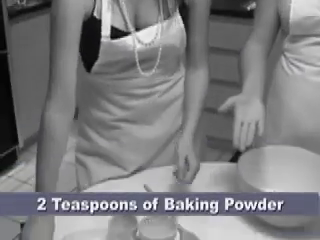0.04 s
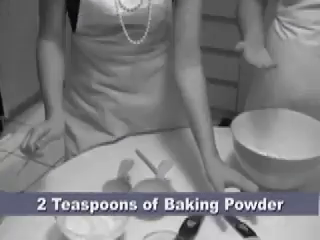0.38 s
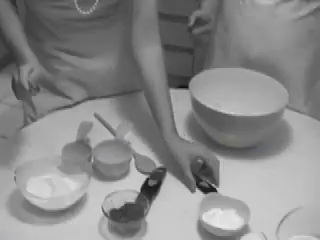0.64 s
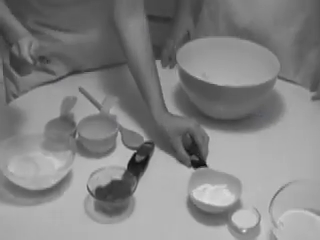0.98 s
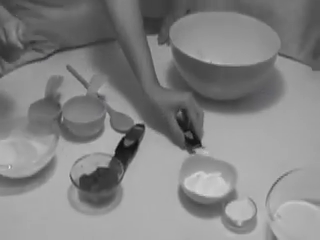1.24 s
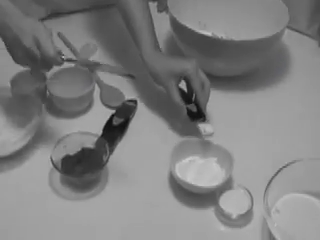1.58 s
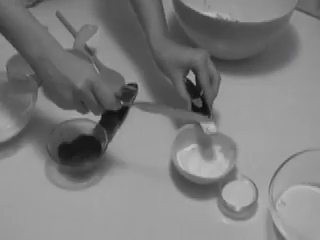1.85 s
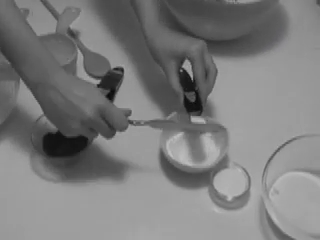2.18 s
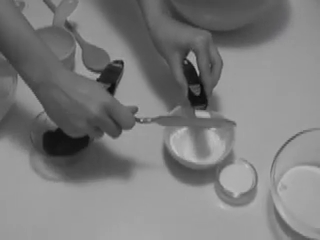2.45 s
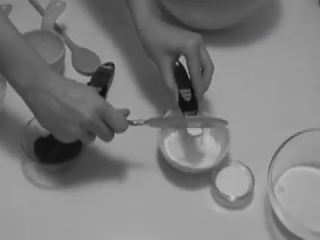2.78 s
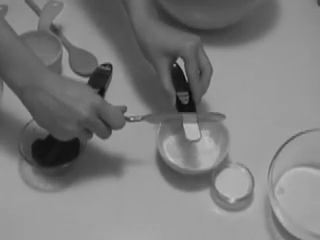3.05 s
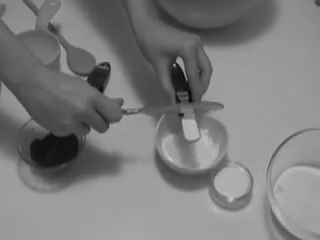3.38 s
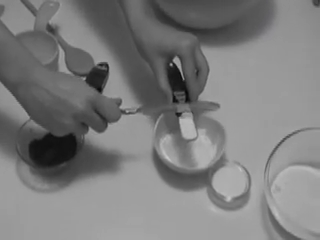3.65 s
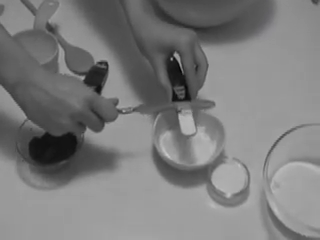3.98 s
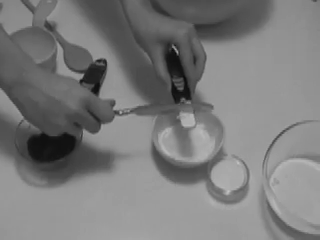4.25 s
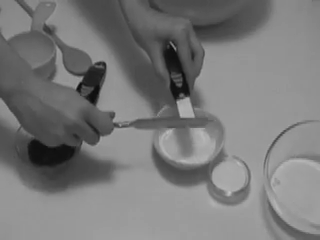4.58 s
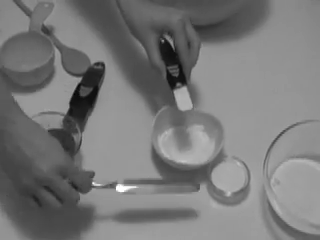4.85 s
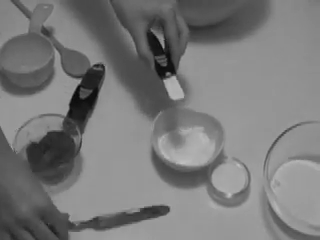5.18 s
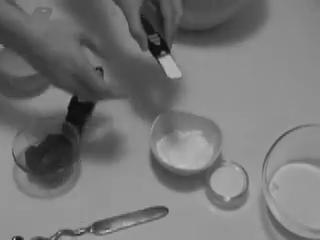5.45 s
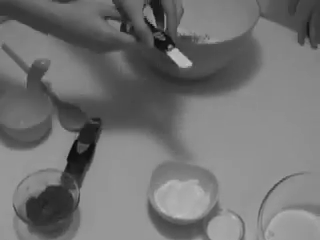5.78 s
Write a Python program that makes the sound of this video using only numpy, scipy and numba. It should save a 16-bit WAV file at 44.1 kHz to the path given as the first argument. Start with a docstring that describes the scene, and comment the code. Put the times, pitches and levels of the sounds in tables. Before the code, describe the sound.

A hard utensil clacks down in a kitchen, followed by soft brushing of hands and a couple of faint spoon ticks on a small bowl. A knife blade taps a metal measuring spoon and scrapes lightly across it, levelling powder with a brief rasp. Near the end the knife drops on the table, bouncing and ringing loudly. The microphone is close, with short room reverberation and a faint motor whine.

```python
"""In a live kitchen, a knife levels a spoonful of powder over a small bowl. A hard utensil clacks down
and hands brush softly; the held blade ticks on the metal spoon and scrapes across it by stick-slip
friction. Near the end the knife drops on the table, bounces and rings in its free modes.
Reverberation follows each blow; a camera with a faint motor whine and gain control listens close by."""
import sys
import numpy as np
from scipy import signal
from scipy.fft import rfft, irfft
from scipy.io import wavfile
from scipy.ndimage import uniform_filter1d
from numba import njit

SR = 44100
rng = np.random.default_rng(int(sys.argv[2]) if len(sys.argv) > 2 else 0)


def wrap_up_sound(samples):
    """Save the sound to the file named by the first command line argument, as 16-bit audio."""
    columns = np.atleast_2d(samples).T
    # keep every value between -1 and 1, then stretch to whole-number steps
    tamed = np.clip(columns, -1, 1)
    steps = np.round(tamed * 32767).astype(np.int16)
    wavfile.write(sys.argv[1], SR, steps)


N = 261645
TIME = np.arange(N) / SR
RING_TIME = TIME[:SR]

# modes of the freely ringing knife: (frequency [Hz], level [dB], t60 [s])
KNIFE_MODES = [(374, -8, .25), (1050, -3, .3), (1104, 0, .17), (1367, -7, .3), (1780, -7, .26),
               (2083, 2, .33), (2659, -7, .3), (2831, -8, .3), (3838, 2.5, .45), (4200, -8, .3),
               (4643, -9, .35), (5052, -12, .35), (6002, -16, .35), (6578, -7, .42), (7238, -16, .7),
               (7560, -8, .14), (8985, -8, .24), (9636, -14, .14), (10320, -18, .2), (11278, -12, .21),
               (13080, -20, .23), (13432, -14, .23), (14485, -24, .22)]
# modes of the blade pressed on the spoon, damped by the hand: (frequency [Hz], level [dB], t60 [s])
HELD_MODES = [(1050, -13, .035), (2540, -7, .025), (2608, -8.5, .11), (3700, -13, .015), (4555, 2, .03),
              (4640, -9, .03), (4850, -10, .02), (5420, -17, .03), (6978, -10, .035), (7680, -16, .02),
              (8060, -17, .04), (10215, -8, .022), (11730, -13, .03), (13890, -23, .03)]
# spectrum of a knock on the tabletop: (frequency [Hz], level [dB])
TABLETOP_SPECTRUM = [(40, -55), (120, -9.5), (230, -14.5), (420, -3), (780, -4.5), (1060, 4.5), (1400, 2.5),
                     (2200, 3), (3800, -0.5), (5600, -6.5), (6700, -10), (8000, -13), (10500, -20),
                     (15000, -44)]
TABLETOP_T60_S = 0.033


def undb(db):
    """Decibels to amplitude ratio."""
    return 10 ** (np.asarray(db) / 20)


def unit(x):
    """Normalisation to unit energy."""
    return x / np.sqrt(np.sum(x ** 2))


def steady(x):
    """Normalisation to unit rms."""
    return x / np.std(x)


def along(rows, hz):
    """Interpolation of (frequency [Hz], value) rows on a logarithmic frequency axis."""
    row_hz, value = np.transpose(rows)
    return np.interp(np.log(hz + 1), np.log(row_hz), value)


def colour(x, rows, tilt_db=0):
    """Minimum-phase filter from (frequency [Hz], gain [dB]) rows, tilted per octave above 400 Hz."""
    size = 4096
    hz = np.fft.rfftfreq(size, 1 / SR)
    octaves = np.log2(np.maximum(hz, 400))
    cepstrum = irfft(np.log(undb(along(rows, hz) + tilt_db * octaves)))
    cepstrum[1:size // 2] *= 2
    cepstrum[size // 2 + 1:] = 0
    return signal.fftconvolve(x, irfft(np.exp(rfft(cepstrum))))[:len(x)]


def low_cut(x, hz):
    """Second-order Butterworth high-pass."""
    return signal.sosfilt(signal.butter(2, hz, "highpass", fs=SR, output="sos"), x)


def fade(t60):
    """Exponential decay, one second long, falling 60 dB in t60 seconds."""
    return np.exp(-np.log(1000) * RING_TIME / t60)


def add(track, start_s, sound):
    """Superposition of a sound on a track."""
    i = int(start_s * SR)
    track[i:i + len(sound)] += sound[:N - i]


def ring(modes):
    """Modal vibration: the point of contact gives each damped sinusoid its own sign and weight."""
    chance = rng.standard_normal((len(modes), 2))
    return unit(sum(undb(db + offset_db) * np.sign(side) * fade(t60) * np.sin(2 * np.pi * hz * RING_TIME)
                    for (hz, db, t60), (offset_db, side) in zip(modes, chance)))


def burst(t60, smooth_bins=41):
    """Modal overlap: dense, quickly dying modes merge into a noise burst with a flat spectrum."""
    x = rng.standard_normal(SR) * fade(t60)
    for _ in range(3):
        spectrum = rfft(x[:SR // 10])
        x = irfft(spectrum / np.sqrt(uniform_filter1d(np.abs(spectrum) ** 2, smooth_bins)))
        x *= RING_TIME[:len(x)] < 2 * t60
    return unit(x)


def knock(t60, spectrum, tilt_db=0, click=0.39):
    """Impact response: a sharp contact pulse, then the short ring of the struck body."""
    x = burst(t60)
    x[0] = -click
    return unit(colour(x, spectrum, tilt_db))


def strokes(rows, rise, curve=0.41):
    """Friction envelope: pressure builds for the share `rise` of each stroke, then eases off."""
    return sum(undb(db) * np.interp(TIME, [s, s + rise * length, s + length], [0, 1, 0]) ** curve
               for s, length, db in rows)


def air(level_db=-47):
    """Ambient noise: the room's steady broadband rumble and hiss."""
    # background noise density: (frequency [Hz], relative level [dB])
    spectrum = [(20, -16), (60, -8.5), (90, -10), (125, -3), (200, -5.5), (400, -7), (650, -6.5), (950, -9),
                (1280, -8), (2240, -16.5), (5570, -24), (6900, -35.5), (12800, -36), (15000, -48)]
    return steady(colour(rng.standard_normal(N), spectrum)) * undb(level_db)


def whine_and_hum(hum_hz=55.2, hum_db=-55, hold_s=2.16, fade_db_per_s=7.5):
    """Random modulation broadens the lines of camera motor and mains; a low hum holds, then fades."""
    # motor and mains lines: (frequency [Hz], level [dB], width [Hz], modulation depth [0-1])
    lines = [(119.9, -58.5, 4, .4), (599.4, -64, 4, .3), (1198, -54.5, 10, .7), (1798, -62, 8, .4),
             (2398, -67, 6, .4), (3596, -71, 4, .2), (4196, -73, 4, .2), (4795, -73, 4, .2),
             (5394.6, -64.5, 3, .1), (5696, -76, 3, .1), (5994, -73, 3, .1)]
    hum_gain = undb(hum_db - fade_db_per_s * np.maximum(TIME - hold_s, 0))
    out = np.sqrt(2) * hum_gain * np.sin(2 * np.pi * hum_hz * TIME)
    for hz, db, width_hz, depth in lines:
        phasors = rng.standard_normal((1024, 2)) @ [1, 1j]
        wobble = 1 + depth * np.interp(TIME * 2 * width_hz, np.arange(len(phasors)), phasors)
        out += undb(db) * steady(np.real(wobble * np.exp(2j * np.pi * hz * TIME)))
    return out


def set_down(t60=0.014, ring_db=-17, knife_db=-22, knife_tilt_db=6):
    """Structure-borne coupling: a utensil clacks down and the jolt rings the knife on the table."""
    # the utensil's impacts: (time [s], level [dB])
    impacts = [(0.0246, -17), (0.0287, 8), (.031, -4), (.042, -0.5), (0.069, -14), (.098, -4.5)]
    # its clack: (frequency [Hz], level [dB])
    clack_spectrum = [(40, -25), (130, -17), (400, -9), (900, -0.5), (1500, 2.5), (2700, 4), (3900, -5),
                      (5200, 0), (6000, -6), (6700, -15.5), (7600, -10.5), (8800, -22.5), (10000, -15),
                      (12000, -36), (16000, -28)]
    # its thin ring: (frequency [Hz], level [dB], t60 [s])
    utensil_modes = [(1284, -3, .2), (2514, 0, .2), (5025, -1, .22), (10450, -12, .25), (13500, -19, .18)]
    knife_modes = [(hz, db + knife_tilt_db * np.log2(hz), decay) for hz, db, decay in KNIFE_MODES]
    out = np.zeros(N)
    for s, db in impacts:
        add(out, s, undb(db) * knock(t60, clack_spectrum))
        add(out, s, undb(db + ring_db) * ring(utensil_modes) + undb(db + knife_db) * ring(knife_modes))
    return out


def brushing(grain_db=4):
    """Friction noise: countless tiny contacts of skin and powder sum to a grainy hiss."""
    # brushes of hands, spoon and powder: (start [s], duration [s], level [dB])
    brushes = [(.3, 0.48, -57.5), (.67, 0.22, -52.5), (.92, 0.29, -57), (1.26, 0.16, -55.5),
               (1.6, 0.44, -57), (1.95, 0.53, -59.5)]
    spectrum = [(400, -36), (1800, 7), (2600, 12.5), (5000, 9.5), (8000, -0.5), (11000, 1), (14000, -10)]
    grains = rng.standard_normal(N) * undb(grain_db * rng.standard_normal(N))
    return steady(colour(grains, spectrum)) * strokes(brushes, rise=0.21)


def spoon_ticks(t60=0.035):
    """Damped impact: the spoon touches the bowl, muffled by the powder."""
    # light touches: (time [s], level [dB])
    touches = [(1.171, -28), (1.828, -18), (5.709, -21)]
    # their tick: (frequency [Hz], level [dB])
    spectrum = [(500, -15), (1700, 11), (3000, 3), (5500, 1), (7800, -6.5), (9500, -10), (14000, -15)]
    out = np.zeros(N)
    for s, db in touches:
        add(out, s, undb(db) * knock(t60, spectrum))
    return out


def handling_bumps():
    """Resonance: each dull, soft contact excites one broad low peak."""
    # bumps of handling: (time [s], level [dB], resonance [Hz], t60 [s])
    contacts = [(2.135, -14.5, 620, 0.31), (2.244, -15.5, 332, 0.089)]
    out = np.zeros(N)
    for s, db, hz, t60 in contacts:
        resonance = [(hz / 2, -26), (hz, 0), (hz * 2, -36), (hz * 10, -60)]
        add(out, s, undb(db) * unit(colour(burst(t60), resonance)))
    return out


def blade_taps(tick_db=-11, tick_growth=0.56, tick_t60=0.035, ring_tilt_db=-2, tick_tilt_db=1.7):
    """Contact as a low-pass: each tap on the spoon has its own brightness; dull ones miss high modes."""
    # taps on the spoon: (time [s], level [dB], excitation cutoff [Hz])
    taps = [(2.3476, -7, 4000), (2.393, -21.5, 9150), (2.6369, -2, 12100), (2.673, -23, 6000),
            (2.736, -12, 10500), (2.797, -20.5, 9000), (2.857, -23.5, 13000), (2.983, -29, 11000),
            (3.9439, -2, 4700), (4.164, -25, 6060), (4.539, -23, 9000), (4.647, -18, 11000),
            (4.6519, -14, 11000)]
    # their dry tick: (frequency [Hz], level [dB])
    tick_spectrum = [(300, -22), (1000, -17), (1700, -6), (2500, 15.5), (5000, -15), (6200, -18.5),
                     (10500, -17), (14000, -15)]
    out = np.zeros(N)
    for s, tap_db, cutoff_hz in taps:
        modes = []
        for hz, db, t60 in HELD_MODES:
            rolloff_db = 10 * np.log10(1 + (hz / cutoff_hz) ** 7)
            modes.append((hz, db + ring_tilt_db * np.log2(max(hz, 2500)) - rolloff_db, t60))
        add(out, s, undb(tap_db) * ring(modes))
        tick = knock(tick_t60, tick_spectrum, tick_tilt_db * np.log2(cutoff_hz / 10000), click=0.11)
        # the tick grows more slowly than the ring, so firm taps mostly ring
        add(out, s, undb(tick_db + tick_growth * tap_db) * tick)
    return out


def slips(per_s, spread_db):
    """Stick-slip excitation: a Poisson train of pulses of uneven size."""
    return steady((rng.random(N) < per_s / SR) * undb(spread_db * rng.standard_normal(N)))


def catches(per_s=45, spread_db=4):
    """Amplitude modulation by uneven grip: the blade catches and lets go."""
    gain = undb(spread_db * np.interp(TIME * per_s, np.arange(N), rng.standard_normal(N)))
    return gain / np.sqrt(np.mean(gain ** 2))


def blade_slide():
    """Stick-slip friction on powder grains: sparse slips ring the blade, dense ones merge into a rasp."""
    # slides over the spoon's rim: (start [s], duration [s], level [dB])
    slides = [(2.72, 0.33, -54), (3.15, 0.17, -58), (4.05, 0.31, -62), (4.32, 0.084, -52.5),
              (4.44, .045, -49), (4.51, 0.18, -49.5)]
    # sweeps through the heaped powder: (start [s], duration [s], level [dB])
    sweeps = [(4.515, 0.077, -43), (4.61, 0.059, -43.5)]
    # rasp of the edge in the powder: (frequency [Hz], level [dB])
    rasp_spectrum = [(300, -28), (2000, -18), (2380, 10.5), (2900, 5), (3500, 8.5), (4000, -2), (4800, 3),
                     (5700, -6), (7000, -10), (9000, -18), (10400, -6), (12500, -48), (15000, -32)]
    slip_spectrum = [(1000, -4), (2600, 4.5), (4600, -7), (7200, 2), (10500, -4), (14000, -5)]
    ringing = signal.fftconvolve(slips(per_s=170, spread_db=2), ring(HELD_MODES))[:N]
    ticking = colour(ringing, slip_spectrum)
    rasp = steady(colour(slips(per_s=2400, spread_db=7), rasp_spectrum))
    return ticking * catches() * strokes(slides, rise=0.54) + rasp * strokes(sweeps, rise=0.65)


def knife_drop(clink_db=-1, clink_t60=0.038, metal_tilt_db=-2.1, tilt_share=0.5,
               shimmer_db=6, shimmer_hz=8500, damping_db=5, contact_s=0.0056, radiation_hz=550):
    """Impact excitation: each bounce of the knife thuds on the table and rings the metal's free modes."""
    # blows on the tabletop: (time [s], thud level [dB], tilt [dB/octave], ring level [dB])
    blows = [(5.0885, 6, 5.5, 6), (5.17, 4, 1.5, -4.5), (5.2111, 2, 1.5, 0), (5.2346, -5, -2.5, -6.5),
             (5.326, 4.5, -3, 9), (5.33, 19, -2.5, 0), (5.358, 0, 0, -22), (5.369, 0, 2, -10),
             (5.386, 8.5, -1, -4), (5.394, 12.5, -3, -13), (5.417, 7, -3, 2), (5.4335, 12, -3, -13),
             (5.4451, 15.5, -0.3, -3)]
    thuds, metal = np.zeros(N), np.zeros(N)
    for s, thud_db, tilt_db, ring_db in blows:
        add(thuds, s, undb(thud_db) * knock(TABLETOP_T60_S, TABLETOP_SPECTRUM, tilt_db))
        # a harder contact favours the high modes; the topmost shimmer after any blow
        slope_db = metal_tilt_db + tilt_share * tilt_db
        free = [(hz, db + slope_db * np.log2(max(hz, 1800)) + shimmer_db * (hz > shimmer_hz), t60)
                for hz, db, t60 in KNIFE_MODES]
        # against the table the same modes die quickly
        touching = [(hz, db, clink_t60) for hz, db, _ in free]
        # each contact also damps the ringing from earlier bounces
        metal *= undb(np.interp(TIME, [s, s + contact_s], [0, -damping_db]))
        add(metal, s, undb(ring_db) * (ring(free) + undb(clink_db) * ring(touching)))
    # the narrow blade radiates little bass
    return thuds + settling(), low_cut(metal, radiation_hz)


def settling(start_s=5.461, first_gap_s=0.026, shrink=0.68, first_db=-3, step_db=-3, bounces=5):
    """Inelastic rebound: the knife rocks to rest, each bounce sooner and weaker than the last."""
    out, s = np.zeros(N), start_s
    for k in range(bounces):
        add(out, s, undb(first_db + k * step_db) * knock(TABLETOP_T60_S, TABLETOP_SPECTRUM, tilt_db=2))
        s += first_gap_s * shrink ** k
    return out


def kitchen(x, build_s=0.012):
    """Reverberation: diffuse reflections build up, then decay exponentially, the treble first."""
    # reverberation times: (frequency [Hz], t60 [s])
    decay_times = [(100, 0.75), (500, 0.54), (1500, 0.57), (3000, 0.51), (6000, 0.41), (14000, 0.39)]
    centres, t60s = np.transpose(decay_times)
    noise, hz = rfft(rng.standard_normal(SR)), np.fft.rfftfreq(SR, 1 / SR)
    bands = [irfft(noise * along(np.c_[centres, share], hz), SR) for share in np.eye(len(centres))]
    tail = sum(band * fade(t60) for band, t60 in zip(bands, t60s))
    return signal.fftconvolve(x, unit(tail * (1 - np.exp(-RING_TIME / build_s))))[:N]


def scene(table_room_db=-2, clack_room_db=1, metal_room_db=-7, blade_room_db=-12):
    """Mid-side stereo: near sounds sit in the middle; room and background spread around them."""
    # stereo width of the near sounds: (frequency [Hz], side relative to mid [dB])
    near_width = [(300, -18), (2500, -23), (5000, -29), (6400, -17), (8000, -12), (9000, 3), (11000, -20),
                  (14000, -2)]
    # of the reverberation: (frequency [Hz], side relative to mid [dB])
    room_width = [(100, -30), (700, -20), (1900, -13.5), (3200, -21), (5000, -53), (6100, -15), (7400, 0.5),
                  (8600, 6.5), (10500, -2.5), (14000, -6)]
    # of the background: (frequency [Hz], side relative to mid [dB])
    air_width = [(50, -0.5), (250, -10.5), (1200, -9.5), (2200, -9.5), (4000, -10), (6000, 1.5), (7400, 1),
                 (8400, 10), (10000, 4.5), (14000, -4)]
    thuds, metal = knife_drop()
    clack = set_down()
    levelling = blade_taps() + blade_slide() + brushing() + spoon_ticks() + handling_bumps()
    near = thuds + clack + metal + levelling
    # the broad tabletop radiates far more into the room than the thin blade
    sent = (undb(table_room_db) * thuds + undb(clack_room_db) * clack
            + undb(metal_room_db) * metal + undb(blade_room_db) * levelling)
    mid = near + kitchen(sent) + air() + whine_and_hum()
    # the sound is nearly mono through the midrange and spreads wide in the high treble
    side = colour(near, near_width) + colour(kitchen(sent), room_width) + colour(air(), air_width)
    # the lower midrange leans to the right
    lean = (undb(1.25) - 1) * colour(mid, [(150, -10), (500, 1.5), (1200, 2.5), (2500, -11)])
    return np.array([mid + side - lean, mid - side + lean])


@njit
def follow(x, attack, release):
    """Envelope detection: one-pole smoothing with separate rates for rise and fall."""
    out, level = np.empty(len(x)), 0.
    for i in range(len(x)):
        level += (x[i] - level) * (attack if x[i] > level else release)
        out[i] = level
    return out


def record(dry, threshold_db=-19, ratio=2.26, attack_s=0.0086, release_s=0.18,
           ceiling=0.93, low_hz=24, top_hz=14600):
    """Compression ducks the loud blows, saturation rounds the peaks, filters cut deep bass and top."""
    envelope = follow(np.abs(dry).max(axis=0), 1 / (attack_s * SR), 1 / (release_s * SR))
    gain = np.maximum(envelope / undb(threshold_db), 1) ** (1 / ratio - 1)
    rounded = ceiling * np.tanh(dry * gain / ceiling)
    low_pass = signal.ellip(8, 0.2, 70, top_hz, fs=SR, output="sos")
    return signal.sosfilt(low_pass, low_cut(rounded, low_hz))


dry = scene()
out = record(dry)
wrap_up_sound(out)
```